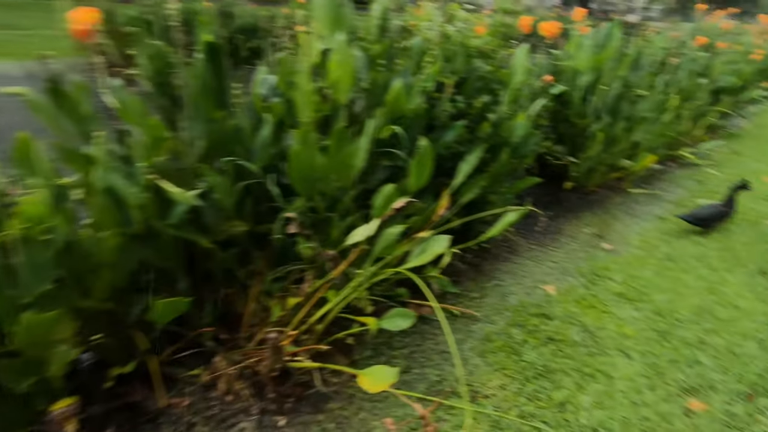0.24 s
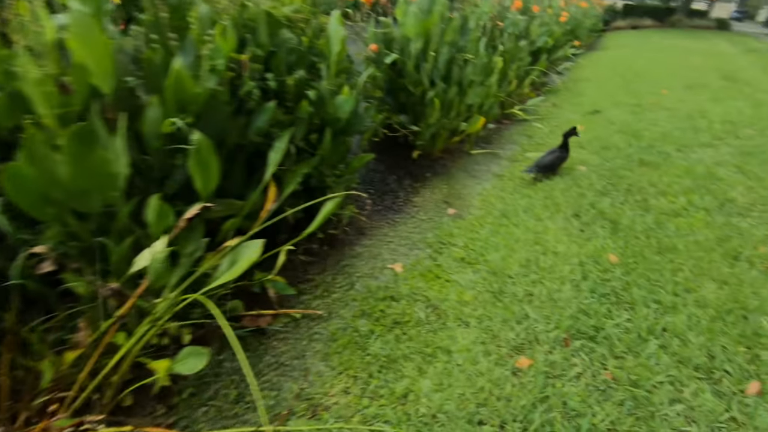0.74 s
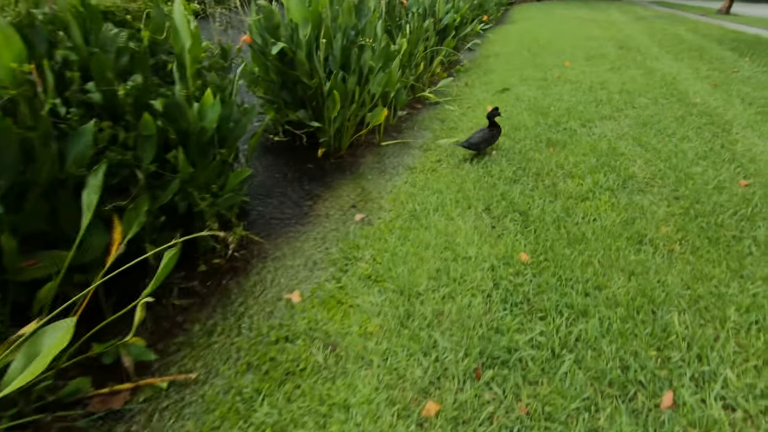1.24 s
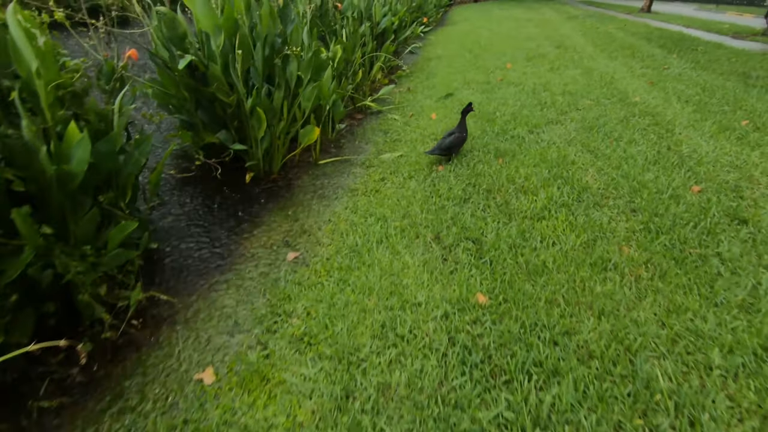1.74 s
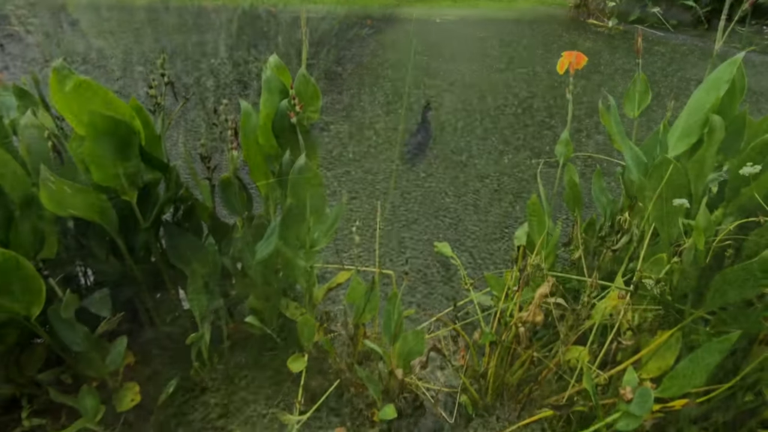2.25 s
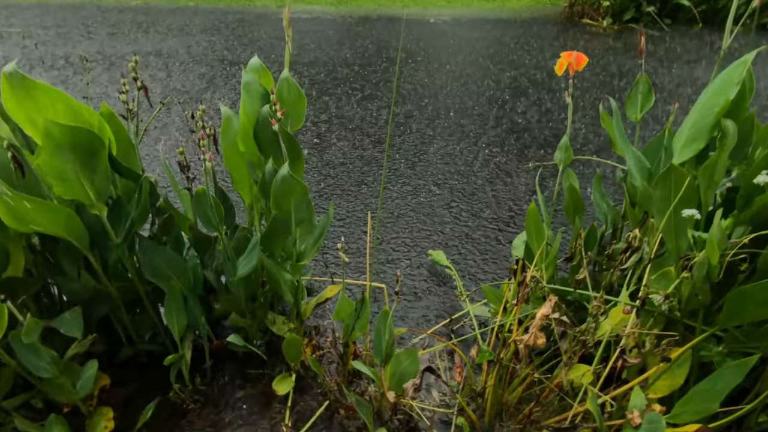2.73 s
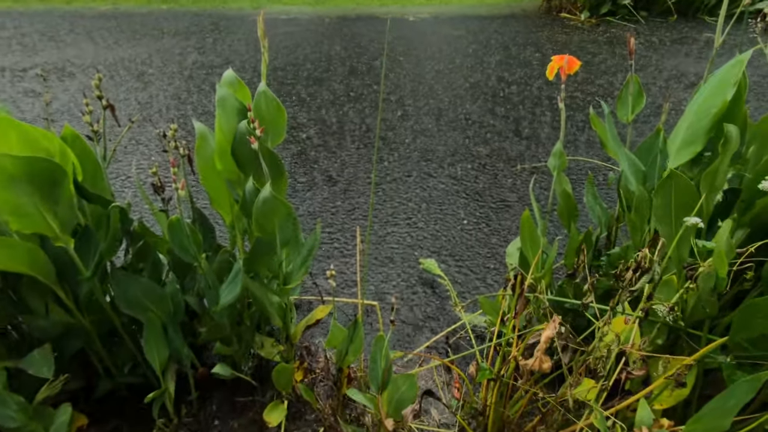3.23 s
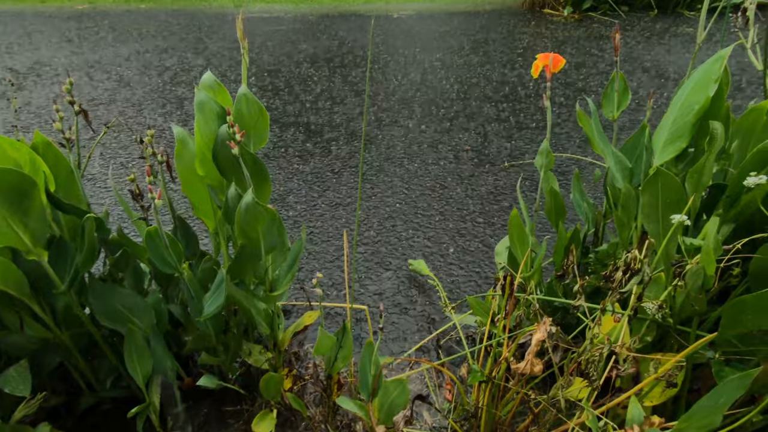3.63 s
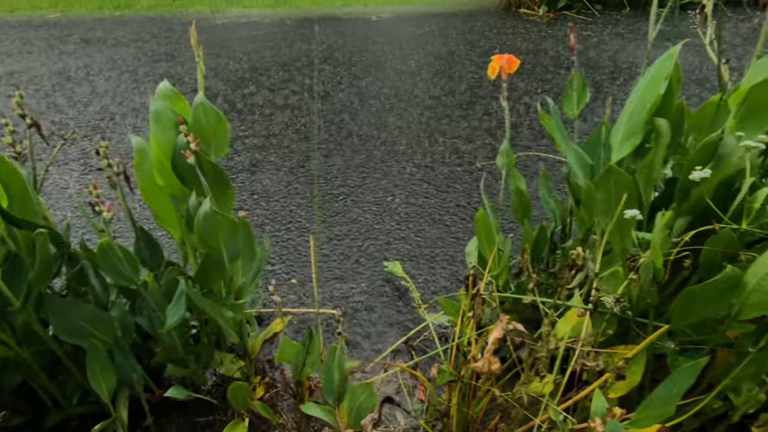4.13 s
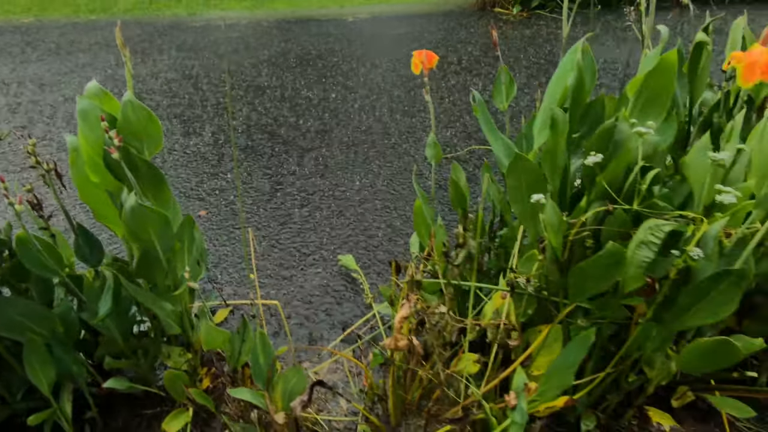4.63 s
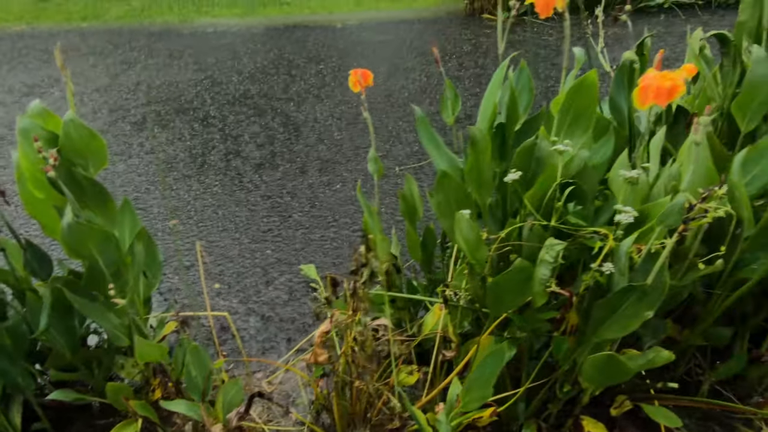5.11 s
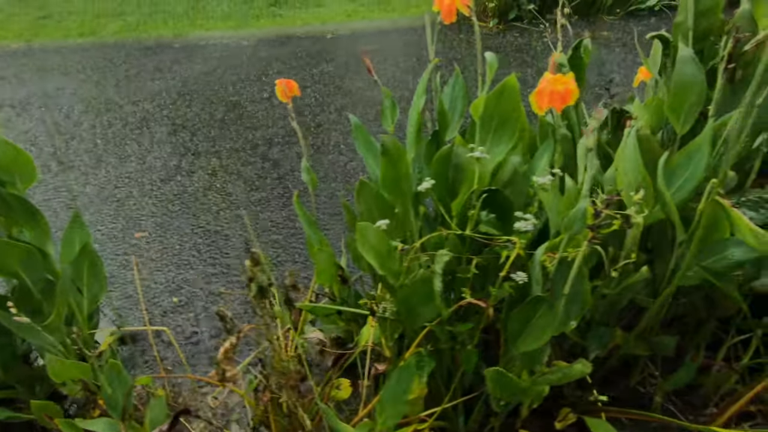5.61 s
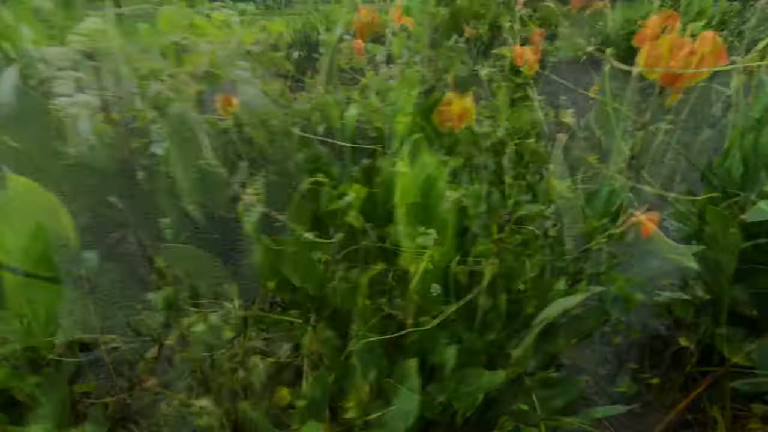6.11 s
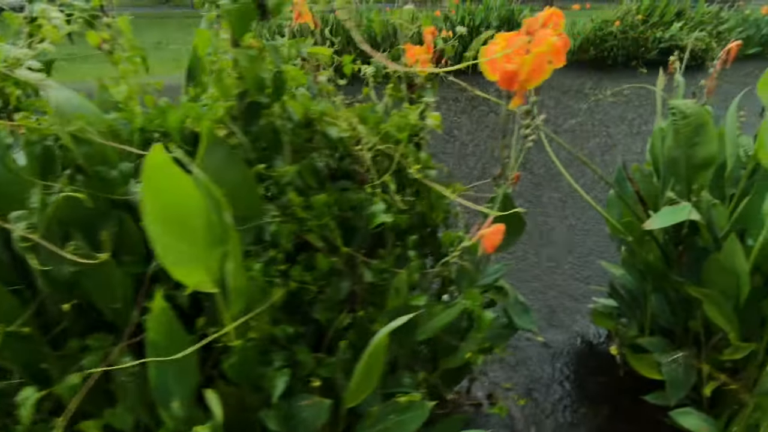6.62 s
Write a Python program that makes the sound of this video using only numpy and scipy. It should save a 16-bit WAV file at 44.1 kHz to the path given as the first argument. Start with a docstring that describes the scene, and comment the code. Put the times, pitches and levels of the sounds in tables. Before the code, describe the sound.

Heavy rain hisses steadily on grass and leaves, with close drops patting and splashing over a low wind rumble on the microphone.

```python
"""Beside a pond, among grass and broad leaves, in heavy rain heard by one muffled microphone.
Countless far drops superpose into hiss, while wind rumbles underneath with a faint wavering hum.
Near drops are separate impacts: they pat the leaves, a few with a brief pitched ring, and splash and
spit on the microphone's sealed port. Wind thumps and knocks on the camera body make low thuds."""
import sys
import numpy as np
from scipy import signal
from scipy.fft import rfft, irfft, next_fast_len
from scipy.io import wavfile
from scipy.ndimage import map_coordinates

SR = 44100
rng = np.random.default_rng(int(sys.argv[2]) if len(sys.argv) > 2 else 0)


def bounce(signal):
    """Save signal as a 16-bit WAV file at the path given by the first command-line argument."""
    frames = np.transpose(np.atleast_2d(signal))
    limited = np.clip(frames, -1, 1)
    pcm = np.round(limited * 32767).astype(np.int16)
    wavfile.write(sys.argv[1], SR, pcm)


N = 302526


def amp(db):
    return 10 ** (np.asarray(db) / 20)


def unit(x):
    return x / np.sqrt(np.mean(x ** 2) + 1e-20)


def curves(rows):
    """Linear interpolation: one value per sample for each column after the time."""
    s, *cols = np.transpose(rows)
    return [np.interp(np.arange(N) / SR, s, c) for c in cols]


def wobble(rate):
    """Random modulation: a spline through rate knots a second."""
    return map_coordinates(rng.standard_normal(int(N * rate / SR) + 4), [np.arange(N) * rate / SR])


def filtered(x, response):
    """Zero-phase filtering: the spectrum of x times a response of frequency."""
    m = next_fast_len(N + SR // 2)
    return irfft(rfft(x, m) * response(np.fft.rfftfreq(m, 1 / SR)), m)[..., :N]


def coloured(x, points):
    """Minimum-phase filtering: a causal response with the gain of (Hz, dB) points."""
    hz, db = np.transpose(points)
    size = 2 ** 14
    gain_db = np.interp(np.log(np.fft.rfftfreq(size, 1 / SR) + 1), np.log(hz + 1), db)
    cepstrum = irfft(gain_db * np.log(10) / 20)
    cepstrum[1:size // 2] *= 2
    cepstrum[size // 2 + 1:] = 0
    return signal.fftconvolve(x, irfft(np.exp(rfft(cepstrum))))[:N]


def impulses(s, db):
    """Impulse excitation: single-sample blows."""
    return np.bincount((s * SR).astype(int), amp(db), N)


def blips(s, db, hz, cycles, sag, length):
    """Damped oscillation: sines decay over cycles while the pitch sags from (1 + sag) * hz."""
    t = np.arange(int(length * SR)) / SR
    turns = hz[:, None] * t
    phase = turns + sag * (1 - np.exp(-turns))
    envelope = (1 - np.exp(-2.5 * turns)) * np.exp(-turns / np.reshape(cycles, (-1, 1)))
    wave = amp(db)[:, None] * np.sin(2 * np.pi * phase) * envelope
    at = (s * SR).astype(int)[:, None] + np.arange(len(t))
    return np.bincount(at.ravel(), wave.ravel(), N + SR)[:N]


def grains(count, hz, scatter, cycles, spread_db, length):
    """Shot noise: randomly timed drops of uneven pitch and size, rms 1."""
    when, rank = rng.random((count, 2)).T
    size_db = -spread_db * np.log(rank + 0.016)
    pitch = np.clip(hz * np.exp(scatter * rng.standard_normal(count)), hz / 3, hz * 3)
    return unit(blips(when * N / SR, size_db, pitch, cycles, sag=0.48, length=length))


# The downpour. Each row: time in seconds, hiss level in dB, leaf patter level in dB.
RAIN_LEVELS = [(0.0, -28.5, -37.5), (1.5, -28.5, -40.5), (2.2, -28.5, -40.5), (2.45, -29, -41.5),
               (2.8, -29, -41.5), (3.3, -29, -41), (4.0, -29, -46), (5.1, -28, -47), (5.7, -28.5, -42),
               (6.2, -29, -46), (6.86, -29, -56)]
# Rain heard through the port. Each row: frequency in Hz, relative gain in dB.
HISS_SPECTRUM = [(88, -26), (150, -8), (346, -9.5), (752, -1), (1280, 1.5), (3000, -1.5), (4560, -2.5),
                 (9740, -33.5), (11800, -43.5), (14000, -64)]

def hiss(near_db=-13, spread_db=4.5):
    """Superposition: far drops blur into Gaussian noise; nearer ones stay single impacts."""
    far = rng.standard_normal(N)
    when, rank, polarity = rng.random((9000, 3)).T
    size = amp(-spread_db * np.log(rank + 0.0066)) * np.sign(polarity - .5)
    near = np.bincount((when * N).astype(int), size, N)
    drops = unit(coloured(far + amp(near_db) * unit(near), HISS_SPECTRUM))
    swell_db = 0.091 * wobble(9) + .5 * wobble(30)
    return amp(curves(RAIN_LEVELS)[0] + swell_db) * drops


# The port's response. Each row: frequency in Hz, gain in dB.
PORT_RESPONSE = [(20, -3.5), (5000, -1.5), (7000, -33), (10000, -23), (14000, -50)]
PORT_HZ, PORT_DECAY_S = 4600, 0.00039  # resonance of the air in the port

def sealed_port(x):
    """Transmission loss: the seal dulls direct knocks."""
    return coloured(x, PORT_RESPONSE)


def patter(bumps_db=-48, spray_over_hiss_db=-11):
    """Random excitation: small drops pat the leaves, bump the camera body and ring the port."""
    hiss_db, leaf_db = curves(RAIN_LEVELS)
    leaves = grains(count=1200, hz=452, scatter=0.56, cycles=0.58, spread_db=2.5, length=.03)
    bumps = grains(count=250, hz=95, scatter=0.35, cycles=0.37, spread_db=3.5, length=.08)
    spray = grains(count=1200, hz=PORT_HZ, scatter=0.056, cycles=14.0, spread_db=-1.0, length=0.0091)
    return amp(leaf_db) * leaves + amp(bumps_db) * bumps + amp(hiss_db + spray_over_hiss_db) * spray


# Wind on the microphone. Each row: time in seconds, rumble level in dB, hum level in dB.
WIND_LEVELS = [(0.0, -38, -29.5), (0.2, -41.5, -38.5), (0.5, -34, -43), (0.74, -31.5, -43),
               (0.85, -42, -50), (1.05, -33.5, -45.5), (1.5, -39, -46), (1.68, -38, -53), (1.8, -41.5, -46),
               (2.35, -36, -46), (2.7, -43, -47.5), (3.2, -41.5, -43.5), (3.7, -38.5, -45.5),
               (4.1, -41, -44), (4.4, -42, -46.5), (4.6, -38.5, -46), (5.2, -40.5, -44), (5.45, -38, -41),
               (5.57, -38.5, -42), (5.68, -38, -43), (5.85, -40.5, -42), (6.0, -38.5, -46.5),
               (6.25, -41.5, -49), (6.86, -38, -49.5)]
# The rumble's colour. Each row: frequency in Hz, relative gain in dB.
RUMBLE_SPECTRUM = [(2, 13), (8, -7.5), (25, 8), (50, -4.5), (120, -18), (300, -29.5), (600, -66)]
# The hum's bands. Each row: centre in Hz, half-width in Hz, relative gain in dB.
HUM_BANDS = [(65, 9.9, 3), (92.5, 13, -3.5), (126, 33, 0)]

def wind():
    """Band-limited noise: a broad low band rumbles, and narrow bands waver as a hum."""
    rumble_db, hum_db = curves(WIND_LEVELS)
    rumble = unit(amp(0.57 * wobble(5.9)) * coloured(rng.standard_normal(N), RUMBLE_SPECTRUM))
    bands = lambda f: sum(amp(db) / (1 + ((f - hz) / width) ** 2) for hz, width, db in HUM_BANDS)
    hum = unit(filtered(rng.standard_normal(N), bands))
    return amp(rumble_db) * rumble + amp(hum_db) * hum


# Big drops on near leaves. Each row: start in seconds, level in dB, pitch in Hz, snap level in dB,
# rebound in dB relative to the pat.
LEAF_DROPS = [(0.046, -14, 500, 3, -16), (0.4663, -10, 970, -6, -7), (0.6202, -17, 574, -1, -6),
              (0.7444, -11.5, 503, 1, -24), (0.8626, -15.5, 298, 0, -16), (0.9446, -17, 450, 2, -5),
              (1.0412, -11, 790, 8, -12), (1.1566, -3, 714, 3, -10), (1.1805, -11, 696, 7, -6),
              (1.2287, -4, 645, 8.5, -10), (1.3472, -16, 475, 2, -6), (1.4567, -13, 523, 2, -5),
              (1.6775, -14, 790, 1, -3), (1.7152, -16, 730, 4, -1), (1.8944, -6, 880, -2, -12),
              (1.8964, -2, 450, 2, -7), (1.9587, -11, 980, -1, -7), (2.1025, -12, 676, -3, -8),
              (2.2147, -10, 875, 2, -10), (2.318, -25, 284, -6, -8), (2.3662, -11, 665, 4, -18),
              (3.1542, -13, 288, 1, -14), (3.1857, -6, 1060, 5, -8), (3.5686, -18, 486, -12, -7),
              (3.878, -22, 170, 0, -5), (4.7344, -23.5, 300, -8, -17), (4.8372, -20.5, 296, 2, -16),
              (5.1642, -18, 710, -4, -8), (5.6883, -14, 544, -4, -8), (5.7213, -15, 513, -1, -17)]
# First contact on a leaf. Each row: frequency in Hz, gain in dB.
SNAP_SPECTRUM = [(400, -27), (900, -10), (1500, 5), (2300, 4.5), (4000, -15.5)]

def leaf_pats(rebound_s=0.00247):
    """Impact and elastic rebound: a drop snaps on a leaf and pats it; the leaf swings back lower."""
    s, db, hz, snap_db, rebound_db = np.transpose(LEAF_DROPS)
    cycles = 0.41 - 0.0729 * db  # softer pats ring longer
    snap = coloured(impulses(s, snap_db), SNAP_SPECTRUM)
    pat = blips(s, db, hz, cycles, sag=.8, length=.04)  # the pitch falls as the drop spreads
    rebound = blips(s + rebound_s, db + rebound_db, 0.506 * hz, 0.9 * cycles, sag=0.45, length=0.065)
    return snap + pat + rebound


# Splashes on the port. Each row: start in seconds, level in dB, pitch in Hz, treble level in dB.
PORT_DROPS = [(0.0699, -8, 4600, -27), (0.0819, -13, 4600, -25), (1.887, -10, 4600, -20),
              (1.9587, -18, 4600, -22), (3.0877, -4, 4850, -28), (3.1014, -10, 4300, -30),
              (3.1862, -18, 4300, -23), (3.2054, -4, 4800, -27), (3.2076, -13, 4500, -32),
              (3.237, -24, 4800, -28), (3.5171, -23, 4600, -27), (3.567, -10, 4300, -28),
              (3.6338, -9, 4600, -24), (4.4425, -15, 4600, -23), (4.9226, -14, 4600, -24),
              (5.3321, -18.5, 4600, -23), (5.8212, -24, 4800, -21), (6.1416, -12, 4600, -27),
              (6.4325, -11, 4700, -28), (6.4547, -13, 4900, -23), (6.4836, -17, 3700, -30),
              (6.504, -6, 5050, -12)]
# A splash's treble. Each row: frequency in Hz, gain in dB.
EDGE_SPECTRUM = [(2000, -20), (5000, 14), (8000, 5.5), (11000, -15), (14000, -48)]

def port_splashes(edge_delay_s=0.001):
    """Cavity resonance: a splash briefly rings the air in the port, and a treble edge follows."""
    s, db, hz, treble_db = np.transpose(PORT_DROPS)
    ring = blips(s, db, hz, hz * PORT_DECAY_S, sag=0.076, length=.02)
    edge = coloured(impulses(s + edge_delay_s, treble_db), EDGE_SPECTRUM)
    return sealed_port(ring) + edge


# Tiny droplets at the port. Each row: start in seconds, level in dB.
DROPLETS = [(0.0822, -36), (1.1084, -39), (1.483, -39), (1.8751, -39), (3.1866, -32), (3.5174, -38),
            (3.5823, -37), (3.8292, -39), (5.0823, -39), (5.4288, -36), (6.505, -37), (6.516, -39)]
# A droplet's colour. Each row: frequency in Hz, gain in dB.
DROPLET_SPECTRUM = [(5000, -30), (8500, 0), (11000, -2), (14000, -12)]

def droplet_spits():
    """Impulse response: each tiny blow is a short, high click."""
    return coloured(impulses(*np.transpose(DROPLETS)), DROPLET_SPECTRUM)


# Wind thumps on the microphone and knocks on the camera body.
# Each row: start in seconds, level in dB, pitch in Hz.
LOW_THUDS = [(0.6, -21, 36), (0.703, -19, 28), (0.819, -19, 130), (0.95, -25, 150), (1.16, -18, 191),
             (1.232, -19, 189), (1.466, -28, 140), (2.035, -21, 96), (2.385, -17.5, 112),
             (3.116, -15.5, 89.5), (3.563, -28, 180), (4.736, -11, 40), (5.213, -18.5, 155)]
# A thud's sharp start. Each row: frequency in Hz, gain in dB.
ONSET_SPECTRUM = [(40, 16), (150, 29.5), (280, 20.5), (500, 9), (1000, -24)]

def low_thuds():
    """Heavy damping: a wind thump or a knock starts sharply and dies as a low oscillation."""
    s, db, hz = np.transpose(LOW_THUDS)
    oscillation = blips(s, db, hz, cycles=.8, sag=0.42, length=.15)
    onset = coloured(impulses(s, db), ONSET_SPECTRUM)
    return -(oscillation + onset)


# Brief pitched rings with a few of the near pats. Each row: start in seconds, level in dB, pitch in Hz.
PAT_RINGS = [(1.8885, -18, 1250), (1.8965, -12, 593), (1.9012, -15, 686), (3.5674, -10, 1980),
             (5.722, -15, 700)]

def pat_rings():
    """Free decay: a ring of a few cycles lengthens or brightens a pat."""
    s, db, hz = np.transpose(PAT_RINGS)
    return blips(s, db, hz, cycles=1.7, sag=0.13, length=.02)


def scene():
    """Linear superposition: all sources add at one microphone, which feeds both channels."""
    background = hiss() + sealed_port(patter()) + wind()
    impacts = sealed_port(leaf_pats() + low_thuds() + pat_rings())
    return np.tile(background + impacts + port_splashes() + droplet_spits(), (2, 1))


def record(dry):
    """Band limiting: the camera cuts the highest treble and adds a small constant offset."""
    return filtered(dry, lambda hz: hz < 14150) - .0027


dry = scene()
out = record(dry)
bounce(out)
```